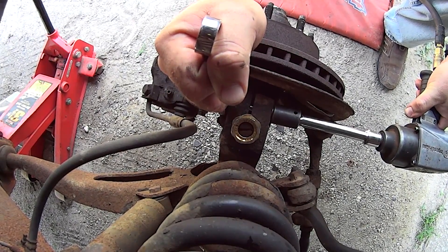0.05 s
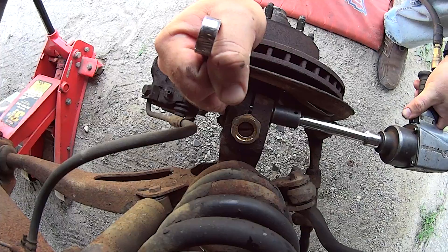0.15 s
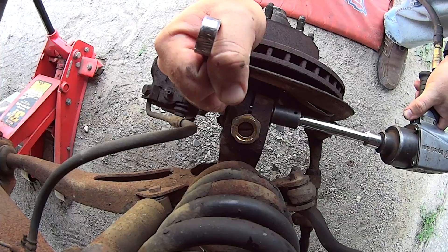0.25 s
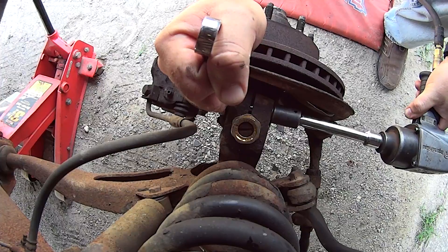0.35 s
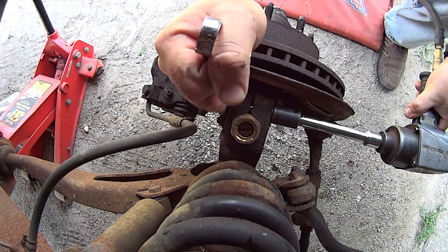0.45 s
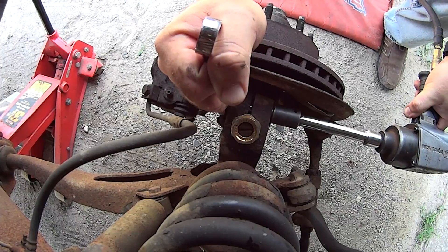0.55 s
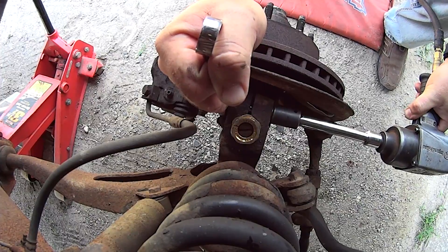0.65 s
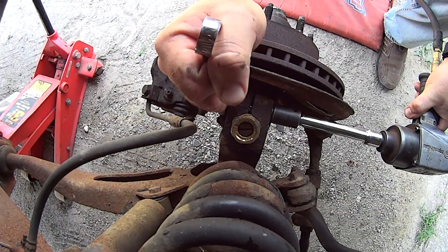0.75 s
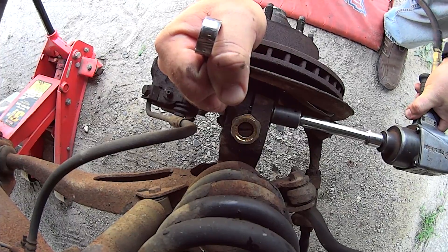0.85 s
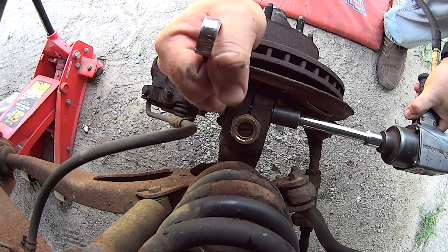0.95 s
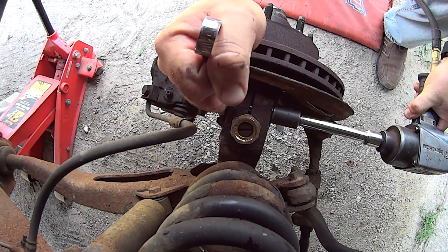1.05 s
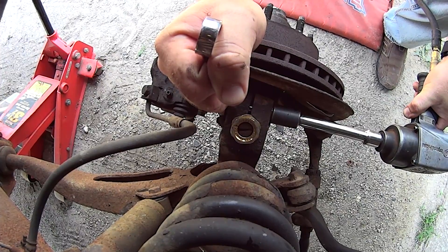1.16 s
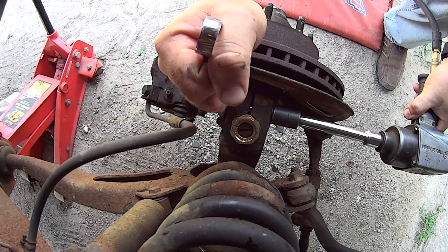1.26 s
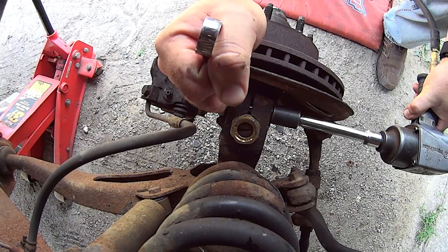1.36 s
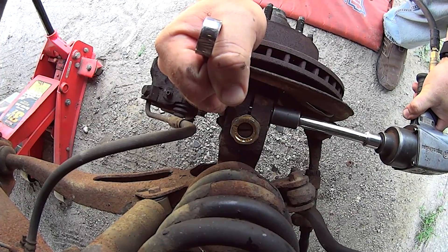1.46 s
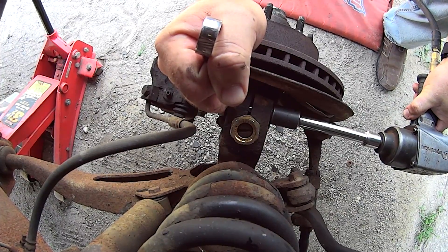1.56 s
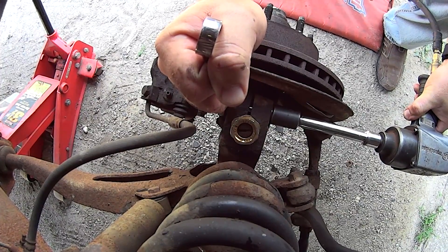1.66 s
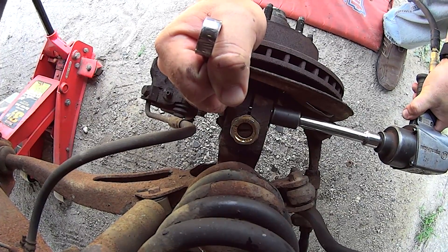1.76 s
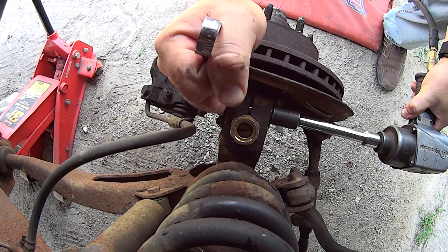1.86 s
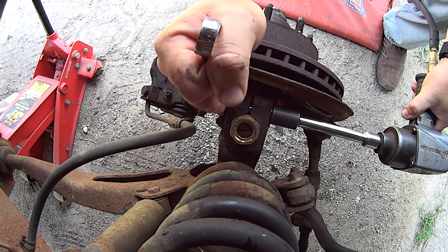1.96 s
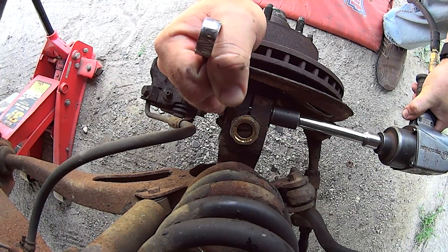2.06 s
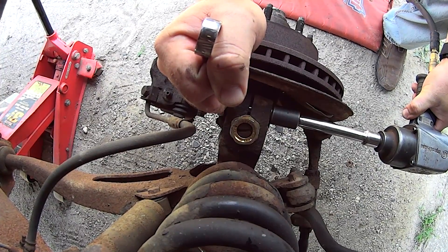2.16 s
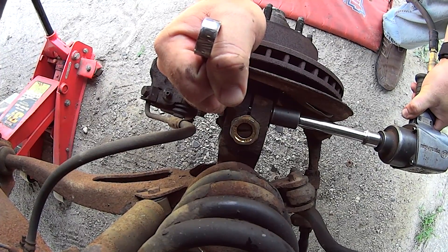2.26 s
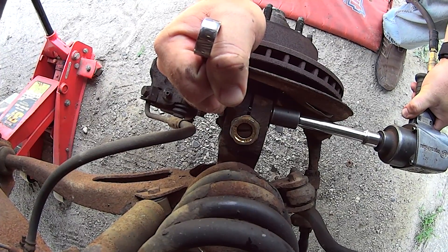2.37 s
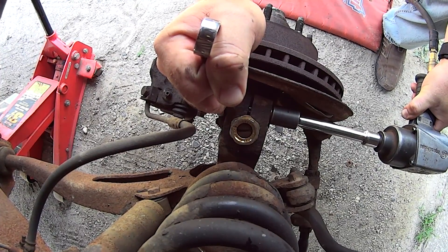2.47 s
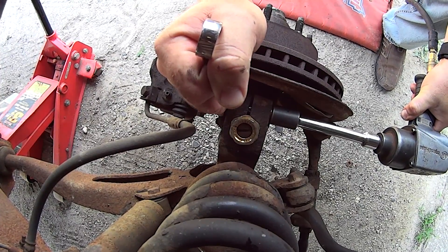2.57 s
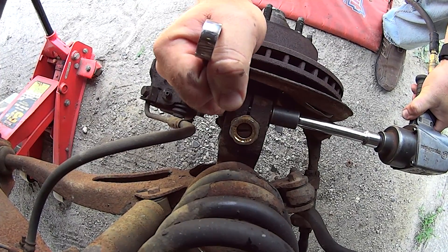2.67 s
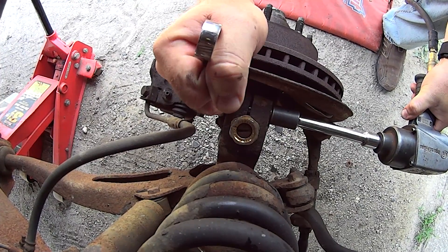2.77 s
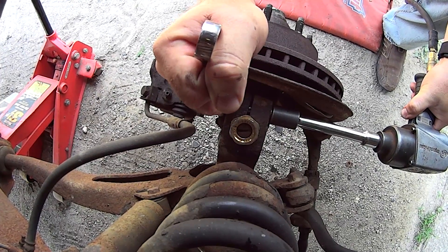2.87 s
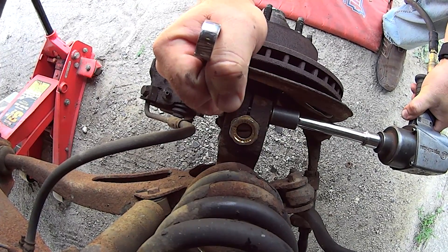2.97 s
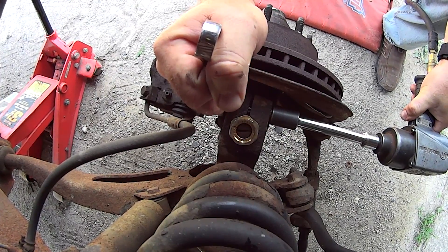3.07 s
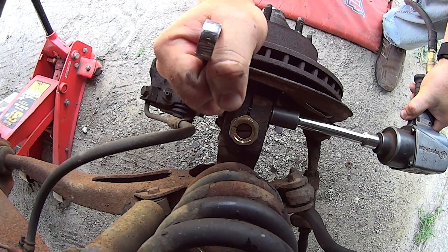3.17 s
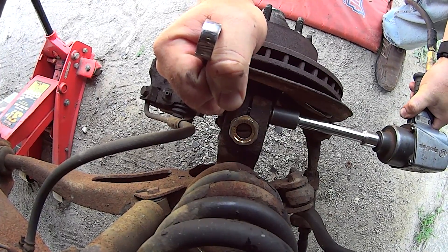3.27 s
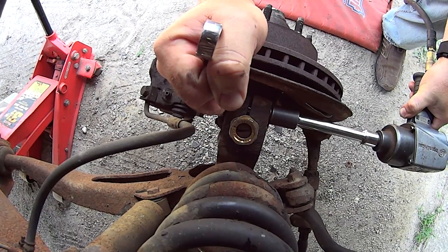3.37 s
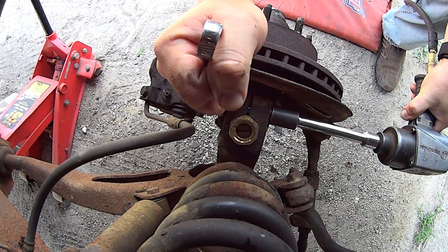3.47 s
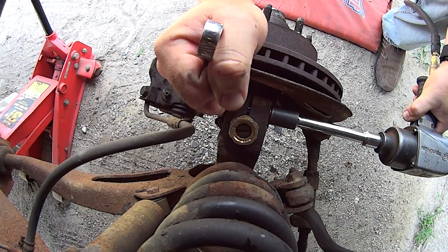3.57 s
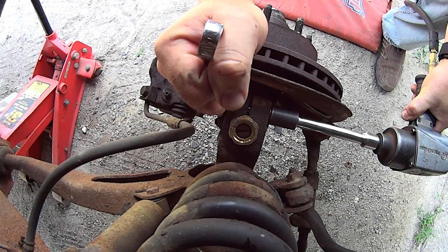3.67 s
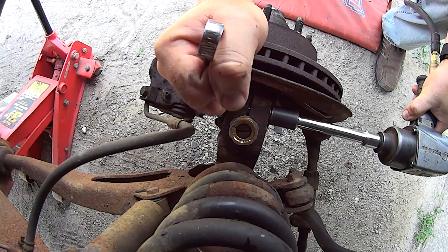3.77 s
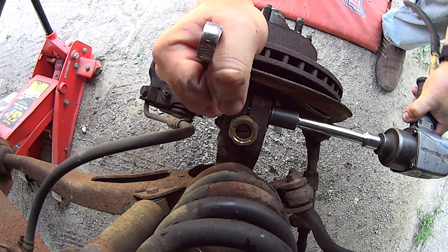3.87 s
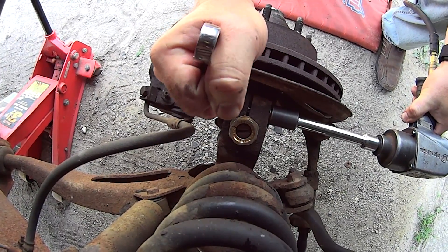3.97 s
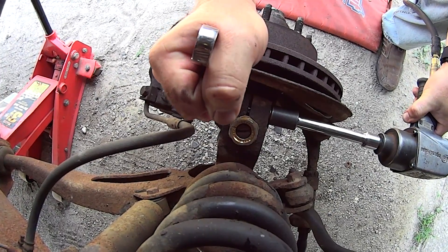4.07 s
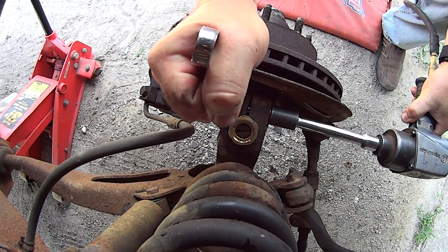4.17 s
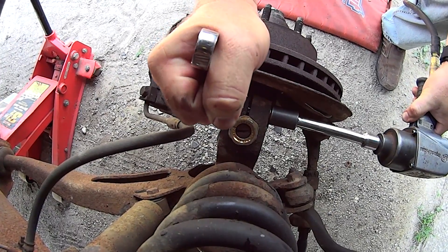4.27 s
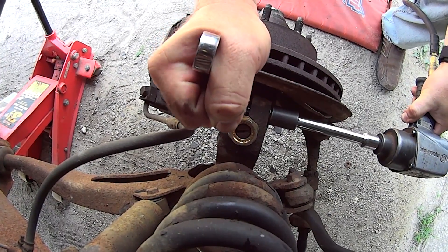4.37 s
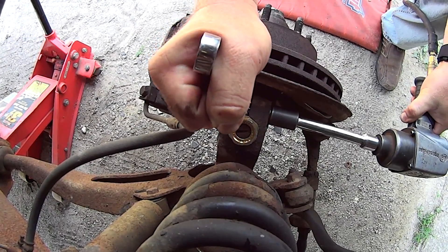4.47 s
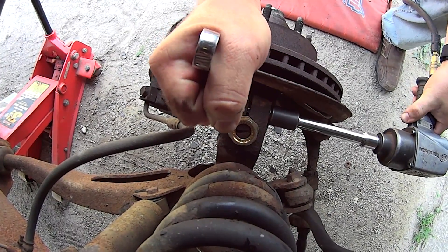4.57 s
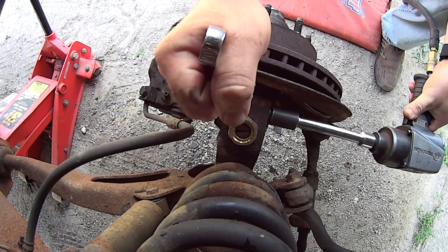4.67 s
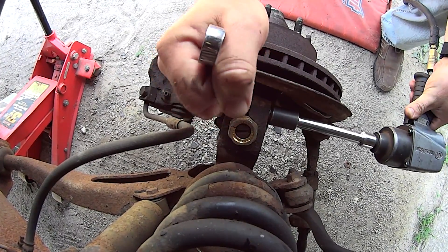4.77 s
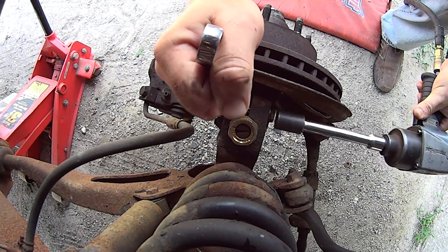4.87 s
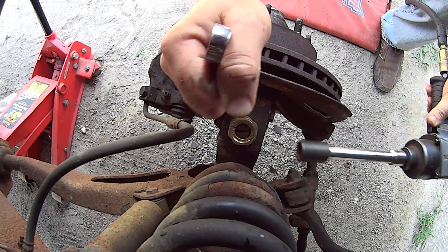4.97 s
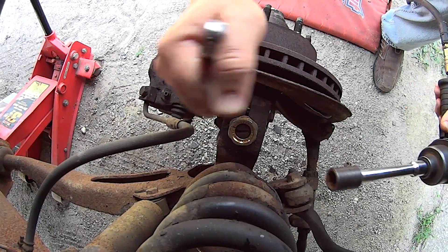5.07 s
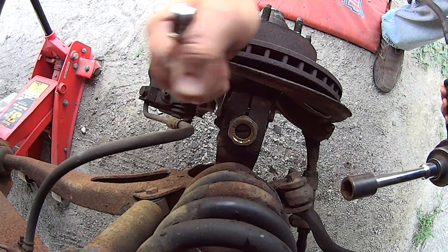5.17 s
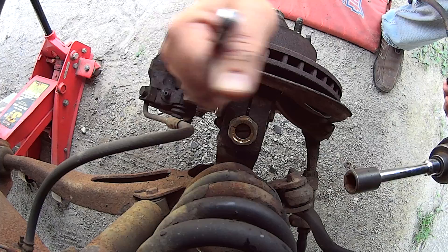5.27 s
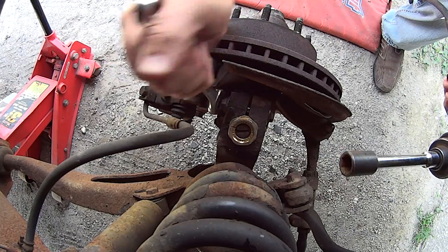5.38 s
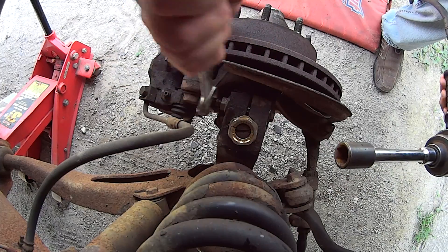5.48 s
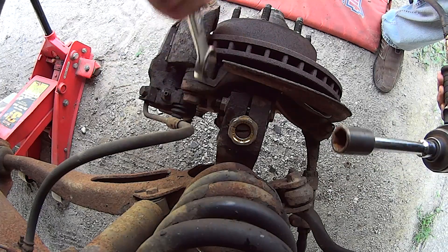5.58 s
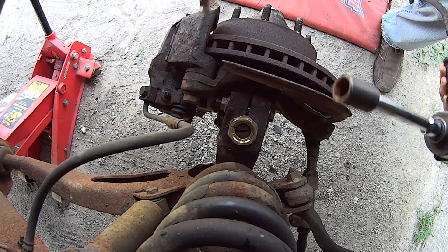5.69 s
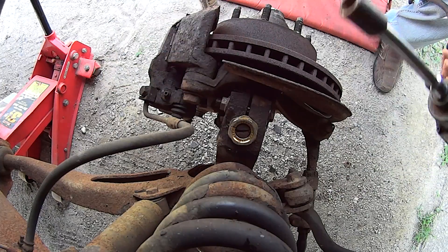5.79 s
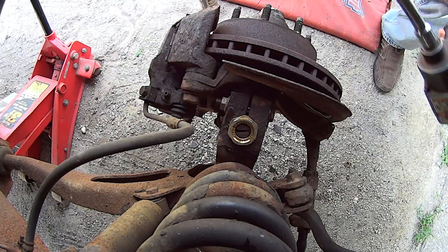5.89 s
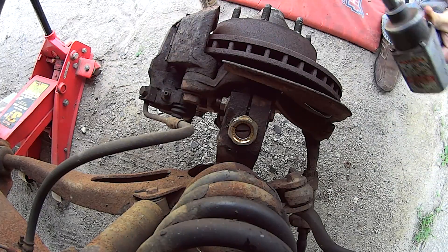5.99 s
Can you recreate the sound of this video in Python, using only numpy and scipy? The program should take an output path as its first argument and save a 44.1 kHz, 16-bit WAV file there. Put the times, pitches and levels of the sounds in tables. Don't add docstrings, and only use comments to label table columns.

```python
import sys
import numpy as np
from scipy import signal
from scipy.fft import rfft, irfft
from scipy.io import wavfile
from scipy.ndimage import uniform_filter1d

SR = 44100
rng = np.random.default_rng(int(sys.argv[2]) if len(sys.argv) > 2 else 0)


def gain_from_db(level_db):
    decades = np.asarray(level_db, float) / 20
    return 10 ** decades


def store_wav(level_fs):
    pcm = np.round(np.clip(np.atleast_2d(level_fs), -1, 1) * 32767)
    wavfile.write(sys.argv[1], SR, pcm.T.astype(np.int16))


N = 265913
TIME_S = np.arange(N) / SR


def rms_one(x):
    return x / np.sqrt(np.mean(x ** 2) + 1e-20)


def in_time(rows):
    s, *columns = np.transpose(rows)
    return [np.interp(TIME_S, s, column) for column in columns]


def at_hz(rows, hz, axis=1):
    rows = np.array(rows)
    return np.interp(np.log(hz), np.log(rows[:, 0]), rows[:, axis])


def clicks(times_s, sizes):
    out = np.full(N, 1e-18)
    index = (np.asarray(times_s) * SR).astype(int)
    np.add.at(out, np.clip(index, 0, N - 1), sizes)
    return out


def dies(x, t60_s):
    return signal.lfilter([1], [1, -gain_from_db(-60 / (t60_s * SR))], x)


def drift(hz):
    lowpass = signal.butter(2, hz, fs=SR, output="sos")
    return rms_one(signal.sosfilt(lowpass, rng.standard_normal(N)))


def halves(x, split_hz, order=2):
    filters = [signal.butter(order, split_hz, kind, fs=SR, output="sos") for kind in ("low", "high")]
    return [rms_one(signal.sosfilt(sos, x)) for sos in filters]


# (frequency [Hz], likeness near [0-1], likeness far [0-1], left lag [rad])
PORTS = [(30, .55, .6, .2), (130, .9, 1, .3), (260, .7, 0.46, 1.1), (600, .9, 0.28, 1.15),
         (1200, .78, .4, 1.0), (2200, .8, .46, .8), (4900, .8, .72, .45), (11060, .76, .54, .4)]


def coloured(spectrum, peaks=(), peaks_db=0., far=False):
    hz = np.arange(N // 2 + 1) * SR / N + 1
    power = gain_from_db(at_hz(spectrum, hz)) ** 2
    for top_hz, width_hz, db in peaks:
        power += gain_from_db(db + peaks_db) ** 2 / (1 + (2 * (hz - top_hz) / width_hz) ** 2)
    alike = np.clip(at_hz(PORTS, hz, axis=1 + far), 0, 1)
    mid, side = rfft(rng.standard_normal((2, N)))
    pair = np.sqrt(1 + alike) * mid + np.sqrt(1 - alike) * side * np.array([[1], [-1]])
    if not far:
        pair[0] *= np.exp(-1j * at_hz(PORTS, hz, axis=3))
    return rms_one(irfft(np.sqrt(power) * pair, N))


def struck(modes, times_s, strength_db, spread_db, swell_s, dispersion):
    out = np.zeros((2, N))
    chance = rng.standard_normal((len(times_s), len(modes)))
    for (hz, db, t60_s), luck in zip(modes, chance.T):
        turn = np.exp(2j * np.pi * hz / SR)
        swell = np.exp(-1 / (swell_s * SR))
        decay = gain_from_db(-60 / (t60_s * SR))
        hits = clicks(times_s, gain_from_db(strength_db + db + spread_db * luck))
        hits = hits * np.exp(1j * dispersion * (hz / 100) ** 2)
        sections = [[1 - swell, 0, 0, 1, -swell * turn, 0], [1, 0, 0, 1, -decay * turn, 0]]
        ring = signal.sosfilt(sections, hits)
        lag_rad = at_hz(PORTS, hz, axis=3)
        out += [(ring * np.exp(-1j * lag_rad)).real, ring.real]
    return out


# (frequency [Hz], level [dB/Hz])
YARD_SPECTRUM = [(20, -39), (59, -9), (141, -0.5), (336, -11), (404, -17.5), (2240, -29), (5640, -39),
                 (10900, -40.5)]
# (time [s], level [dB])
YARD_LEVEL = [(4.7, -51), (5, -53), (5.3, -50.5), (5.5, -51), (5.75, -49.5), (6.03, -50.5)]


def yard_rumble():
    level_db = in_time(YARD_LEVEL)[0] + 1.34 * drift(32)
    return gain_from_db(level_db) * coloured(YARD_SPECTRUM, far=True)


# (frequency [Hz], width [Hz], level [dB])
LEAK = [(947, 44, -63.5), (2246, 140, -74), (3220, 110, -73), (4430, 360, -73.5), (5500, 150, -71.5),
        (6350, 150, -71.5), (7250, 830, -82)]


def air_leak():
    silence = [(20, -120), (20000, -120)]
    return gain_from_db(-61.5 + 1.5 * drift(7.5)) * coloured(silence, LEAK, peaks_db=60.0, far=True)


# (first blow [s], last blow [s], crack [dB], knuckle ring [dB], limiter duck [dB])
SPELLS = [(0.0208, .1303, -8, -20, 10), (.314, .314, -8.5, -49, 6.5), (.3604, .3604, -26.5, -16.5, 1),
          (0.4072, .674, -9, -20, 10.5), (0.7256, .9449, -13, -21, 10), (0.9928, 1.2364, -9.5, -22, 10.5),
          (1.2935, 1.6384, -6, -21.5, 9), (1.69, 1.8065, -9, -24, 11), (1.859, 1.9659, -7.5, -24, 10),
          (2.025, 2.025, -5.5, -22.5, 8), (2.0743, 2.3011, -7, -24, 11), (2.3512, 2.5023, -5, -21.5, 8.5),
          (2.5874, 2.5874, -5, -24.5, 9), (2.6397, 2.881, -5.5, -24.5, 10), (2.9366, 3.1832, -8, -25.5, 13),
          (3.2403, 3.2405, -10, -32, 10), (3.279, 3.442, -6.5, -23.5, 6), (3.4793, 3.8434, -7, -21.5, 8),
          (3.9056, 4.1583, -7.5, -20, 7), (4.218, 4.5949, -6, -20.5, 10), (4.6865, 4.6867, -9, -28, -6)]
SPELL_BLOWS = [3, 1, 1, 6, 5, 6, 7, 3, 3, 1, 5, 4, 1, 5, 5, 1, 4, 7, 5, 7, 1]


def blows():
    rows = []
    for (first_s, last_s, *levels), count in zip(SPELLS, SPELL_BLOWS):
        rows += [(s, *levels) for s in np.linspace(first_s, last_s, count)]
    s, crack_db, ring_db, duck_db = np.transpose(rows)
    luck = rng.standard_normal((3, len(s)))
    crack_db = crack_db + 1.0 * luck[0]
    bright_db = 3 + 1.9 * s + 2.0 * luck[1]
    bright_db[-1] = 3.5
    duck_db = np.maximum(duck_db + 1.2 * luck[2], 0)
    return s, crack_db, bright_db, ring_db, duck_db


# (open [s], shut [s], hiss [dB], dying [dB/s])
PULLS = [
    (-.1, .14, 2, 393),
    (.318, 4.652, 0.5, 1800),
    (4.69, 4.692, -12.5, 450),
]


def trigger(share):
    pulls = []
    for on_s, off_s, db, dying_db_per_s in PULLS:
        opening = (TIME_S - on_s) * 2200
        closing = (off_s - TIME_S) * dying_db_per_s * share
        pulls.append(db + np.minimum(0, np.minimum(opening, closing)))
    return np.max(pulls, axis=0)


def since_blow(s):
    return TIME_S - np.r_[-1, s][np.searchsorted(s, TIME_S)]


# (time [s], exhaust hiss [dB], housing shudder [dB])
EFFORT = [(0, -19.5, -33), (.33, -16.5, -33), (.5, -16.5, -30), (1, -16, -30.5), (1.5, -19.5, -32.5),
          (2.5, -21, -34), (3.5, -21, -34.5), (4, -19.5, -31), (4.6, -22, -32)]
# (frequency [Hz], level [dB/Hz])
HISS = [(180, -49), (300, -18), (800, -7), (1660, -12), (2180, -5.5), (3690, -13), (8070, -14),
        (10900, -20.5)]


def exhaust(s):
    stall_s, stall_width_s, stall_db = 0.028, 0.0069, 8
    sag_db = stall_db * np.exp(-((since_blow(s) - stall_s) / stall_width_s) ** 2)
    level_db = in_time(EFFORT)[0] + trigger(1) - sag_db
    return gain_from_db(level_db + 2.0 * drift(42)) * coloured(HISS)


# (frequency [Hz], level [dB/Hz])
SHUDDER = [(20, -58.5), (49, -18.5), (172, -5), (215, -9.5), (304, 3), (480, -2.5), (620, -7), (1060, -120)]
# (frequency [Hz], width [Hz], level [dB])
HOUSING = [(222, 25, 2.5)]
# (frequency [Hz], level over shudder [dB], t60 [s])
THUD = [(219, 4, .14), (160, -7, 0.064)]
BOUNCE_S = .0295


def housing(s):
    jolt_s, jolt_db, settle_share = 0.02, 7, 0.14
    held = uniform_filter1d((since_blow(s) < jolt_s) * 1., size=300)
    level_db = in_time(EFFORT)[1] + trigger(settle_share) - jolt_db * held
    shudder = gain_from_db(level_db + 1.17 * drift(25)) * coloured(SHUDDER, HOUSING)
    thud_db = level_db[((s + BOUNCE_S) * SR).astype(int)]
    return shudder + struck(THUD, s + BOUNCE_S - .006, thud_db, spread_db=1.0, swell_s=0.0074, dispersion=0)


# (time [s], crack [dB], brightness [dB])
STRAYS = [
    (.207, -25, -3),
    (.334, -11, -1),
    (2.532, -13, 4),
    (2.5533, -15, 6),
    (4.6396, -22.5, -1.5),
    (4.648, -28, 0),
]


def knocks(s):
    lift_s, longest_turn_s = .018, .07
    running = np.diff(s) < longest_turn_s
    rows = [(t + BOUNCE_S, -18, 1.5) for t in s[:-1][running]]
    rows += [(t - lift_s, -14, -2) for t in s[1:][running]]
    rows = rows + rng.standard_normal((len(rows), 3)) * [.0012, 2.5, 2.0]
    return np.r_[rows, STRAYS].T


# (frequency [Hz], level [dB/Hz])
CRACK = [(530, -20), (900, -14), (1500, 0.5), (1650, -17.5), (2190, -4), (3680, -11.5), (8050, -18),
         (10900, -6.5)]
# (frequency [Hz], width [Hz], level [dB])
SOCKET = [(2037, 125, -21.5), (2565, 20, 0), (2862, 22, 4.5), (3286, 54, -3), (4213, 26, 4.5),
          (5130, 730, 1.5), (6047, 193, 4), (6600, 87, -1), (7680, 330, -3.5), (9130, 120, -6)]
# (frequency [Hz], level [dB/Hz])
UNDERBODY = [(300, -20), (700, -2.5), (1500, -3), (2500, -5), (4000, -16), (8000, -30)]


def anvil_crack(s, force_db, bright_db, back):
    back_s, back_db, back_bright_db = back
    dull, bright = halves(coloured(CRACK, SOCKET, peaks_db=5.5), 5500)
    bright_hit = clicks(s, gain_from_db(force_db + bright_db / 2 - 13.5))
    bright_hit += clicks(back_s, gain_from_db(back_db + back_bright_db / 2 - 6.5))
    dull_hit = clicks(s + 0.0011, gain_from_db(force_db - bright_db / 2 - 9.5))
    dull_hit += clicks(back_s, gain_from_db(back_db - back_bright_db / 2 - 10.0))
    rise = signal.lfilter(np.ones(50) / 50, 1, bright_hit)
    crack = bright * (0.42 * dies(rise, 0.06) + 1.69 * dies(rise, 0.038))
    crack += dull * (1.59 * dies(dull_hit, 0.052) + 0.53 * dies(dull_hit, 0.07))
    crack += coloured(UNDERBODY) * 0.1 * dies(dull_hit, 0.3)
    return crack * gain_from_db(1.6 * drift(250))


# (frequency [Hz], level [dB], t60 [s])
PINGS = [(2250, -12.5, .03), (3100, -10, .03), (4250, -9, .02), (8140, -5.5, 0.032), (8320, -10.5, 0.023)]


def socket_pings(s, force_db, back):
    back_s, back_db, _ = back[:, :-len(STRAYS)]
    strength_db = np.r_[force_db - 8.0, back_db - 7.0]
    return struck(PINGS, np.r_[s, back_s], strength_db, spread_db=3.5, swell_s=0.0013, dispersion=.3)


# (frequency [Hz], level [dB], t60 [s])
KNUCKLE = [(449.7, -15.5, 0.095), (528.4, -10, 0.12), (555.2, -6, 0.12), (691.7, -2, .11),
           (761.6, -8, 0.14), (794, -8, .12), (833.5, -.6, 0.14), (914, -6, .11), (979, -3, .13),
           (1040, -11.5, 0.078), (1150, -12, 0.083), (1283, -8, .1), (1487, -8.5, 0.084), (1853, -7, 0.087)]


def knuckle_ring(s, db):
    return struck(KNUCKLE, s + 0.001996, db + 1.5, spread_db=1.86, swell_s=0.012, dispersion=.77)


# (frequency [Hz], level [dB/Hz])
BOOM = [(300, -32.5), (500, -5.5), (700, -2.5), (1000, -3.5), (1200, -11.5), (1900, -15), (2500, -57)]


def disc_boom(s, db):
    swell_s, t60_s, same_share = .014, .085, .55
    hits, plate = clicks(s, gain_from_db(db + 7.5)), coloured(BOOM)
    age = np.arange(SR // 4) / SR
    shape = (1 - np.exp(-age / swell_s)) * gain_from_db(-60 * age / t60_s)
    same = signal.fftconvolve(hits[None], shape * plate[:, :len(age)], axes=1)[:, :N]
    fresh = plate * signal.fftconvolve(hits, shape)[:N]
    return np.sqrt(same_share) * same + np.sqrt(1 - same_share) * fresh


# (frequency [Hz], level [dB], t60 [s])
SPRING = [(322, -48.5, 3.4), (355, -48, 3), (374, -49, 4), (359, -53, 3.8), (506, -58, .8),
          (930, -49.5, 1.4), (700, -50.5, .5)]
RESTS = [
    0.19,
    4.6,
]


def spring_hum():
    return struck(SPRING, RESTS, 0, spread_db=1, swell_s=.02, dispersion=0) * gain_from_db(0.64 * drift(7))


# (frequency [Hz], level [dB], t60 [s])
LET_GO = [(3120, -19, 0.053), (2930, -19, 0.057), (1300, -25, 0.079), (950, -44, 0.35)]


def socket_lets_go(s):
    return struck(LET_GO, s[-1:], 0, spread_db=1, swell_s=0.00074, dispersion=0)


def wrench(s, crack_db, bright_db, ring_db, duck_db):
    force_db = crack_db + 1.026 * duck_db
    shock_db = ring_db + .5 * duck_db
    back = knocks(s)
    air = exhaust(s) + housing(s)
    impact = anvil_crack(s, force_db, bright_db, back) + socket_pings(s, force_db, back)
    ring = knuckle_ring(s, shock_db) + disc_boom(s, shock_db) + socket_lets_go(s)
    return air + impact + ring


# (time [s], level [dB], brightness [dB], t60 [s], ring [dB])
TOUCHES = [(4.687, -20, 3, 0.032, -48), (4.73, -54, -10, 0.041, -69), (4.804, -57, -6, 0.085, -49),
           (4.846, -57, 0, .045, -55), (5.137, -58, 15, 0.076, -73), (5.21, -62, -3, .046, -75),
           (5.253, -48.5, -17, 0.07, -38.5), (5.318, -51, -6, 0.23, -49), (5.346, -53, -4, .19, -47),
           (5.365, -47, 17, 0.034, -48), (5.431, -47.5, -15, 0.031, -64), (5.437, -36, 9, 0.023, -63),
           (5.446, -39, -7.5, 0.04, -45.5), (5.49, -66, -9, .036, -57), (5.664, -63, -9, .05, -73)]
# (frequency [Hz], level [dB/Hz])
SPANNER_BODY = [(500, -13), (1000, -4), (4000, -29), (5000, -8), (11000, -18)]
# (frequency [Hz], width [Hz], level [dB])
SPANNER_PEAKS = [(1800, 250, -4), (2800, 250, -2), (3700, 300, 0), (6000, 350, 0), (8500, 450, -2),
                 (10500, 500, -5)]
# (frequency [Hz], level [dB], t60 [s])
LIGHT = [(530, -3.5, 0.13), (700, -2, 0.11), (834, 0, 0.12), (940, 1, 0.19), (992, -1.5, .16),
         (1290, -3, .1), (1490, -4, .1)]
# (frequency [Hz], level [dB], t60 [s])
CLINK = [(1850, -6, .03), (2770, 0.5, 0.033), (3710, -1.5, 0.031), (5900, -5, 0.028), (8460, -5, 0.022),
         (10500, -10, 0.018)]


def spanner():
    split_hz = 4000
    dull, bright = halves(coloured(SPANNER_BODY, SPANNER_PEAKS), split_hz, order=6)
    scrape = np.zeros((2, N))
    for s, db, bright_db, t60_s, _ in TOUCHES:
        rise_s = 0.0038 * gain_from_db(.7 * (-52 - db))
        near = slice(int((s - .03) * SR), int((s + .3) * SR))
        age = TIME_S[near] - s
        shape = np.where(age < 0, np.exp(np.minimum(age, 0) / rise_s), gain_from_db(-60 * age / t60_s))
        dull_part = gain_from_db(db - bright_db / 2) * dull[:, near]
        bright_part = gain_from_db(db + bright_db / 2) * bright[:, near]
        scrape[:, near] += shape * (dull_part + bright_part)
    touches = np.array(TOUCHES)
    ring = struck(LIGHT, touches[:, 0], touches[:, -1], spread_db=3.0, swell_s=0.0031, dispersion=.77)
    for s, db, bright_db, *_ in TOUCHES[4:]:
        tilted = [(hz, level_db + bright_db / 2 * np.sign(hz - split_hz), t60_s)
                  for hz, level_db, t60_s in CLINK]
        ring += struck(tilted, [s], db - 1.0, spread_db=3.5, swell_s=.001, dispersion=0)
    return scrape * gain_from_db(2.1 * drift(200)) + ring


def limiter(s, duck_db):
    look_ahead_s, release_s = 0.003, 0.016
    let_go = np.exp(-(np.arange(SR // 10) / SR / release_s) ** 2)
    dip_db = signal.fftconvolve(clicks(s - look_ahead_s, 0.85 * duck_db), let_go)[:N]
    return gain_from_db(-uniform_filter1d(dip_db, size=60))


def scene():
    right_db = 1.5
    hits = blows()
    far = yard_rumble() + air_leak() + spring_hum()
    near = (wrench(*hits) + spanner()) * gain_from_db([[-right_db / 2], [right_db / 2]])
    return (near + far) * limiter(hits[0], hits[-1])


def low_pass(x):
    return signal.sosfilt(signal.butter(12, 12230, fs=SR, output="sos"), x)


def record(dry):
    limited = .62 * np.tanh(dry / .62)
    lowpass = signal.cheby2(20, 54, 11300, fs=SR, output="sos")
    return low_pass(signal.sosfilt(lowpass, limited))


dry = scene()
out = record(dry)
store_wav(out)
```